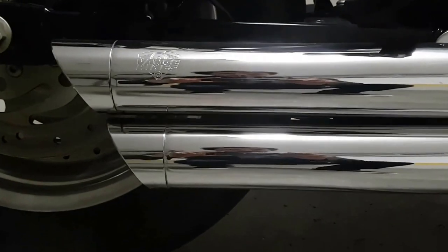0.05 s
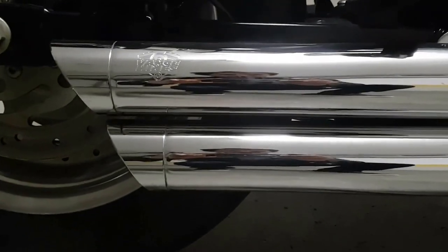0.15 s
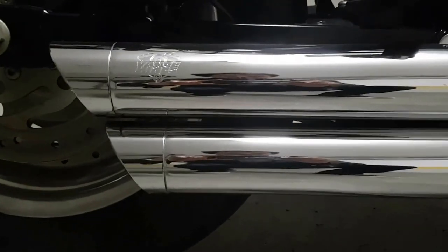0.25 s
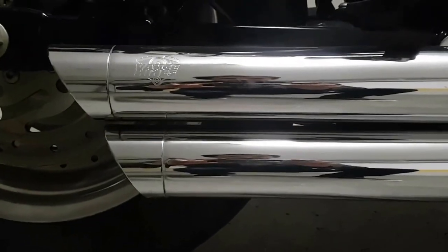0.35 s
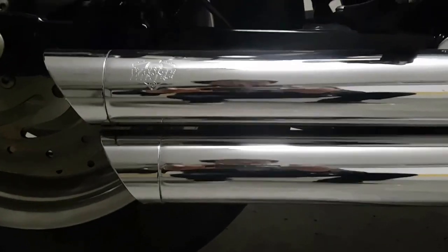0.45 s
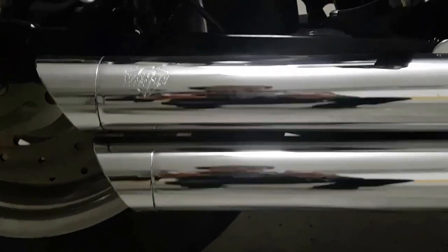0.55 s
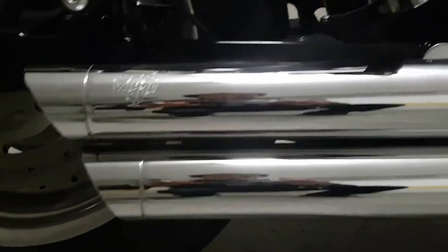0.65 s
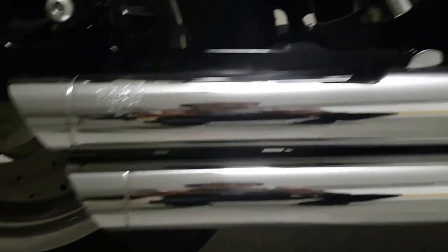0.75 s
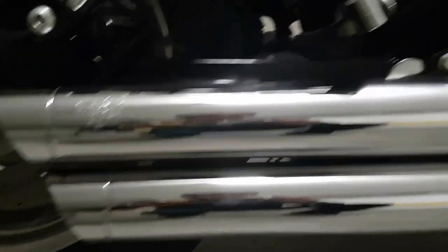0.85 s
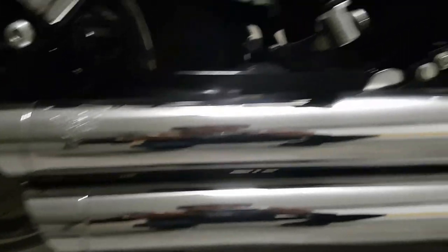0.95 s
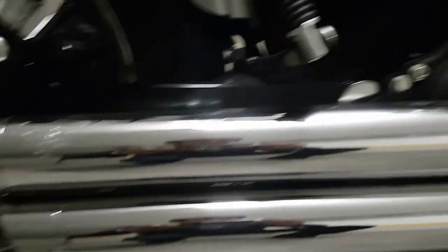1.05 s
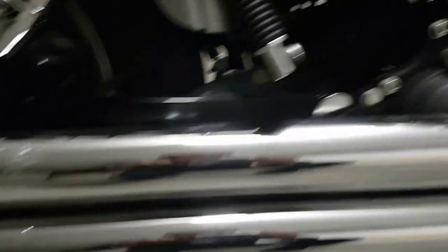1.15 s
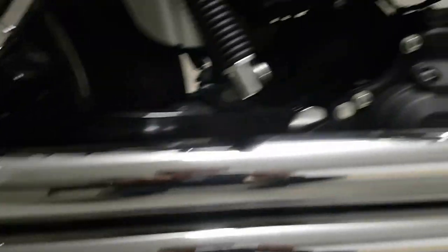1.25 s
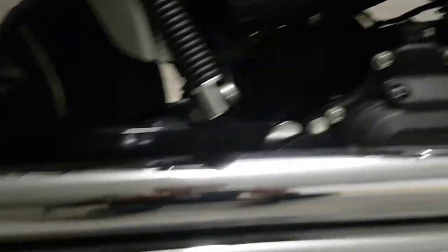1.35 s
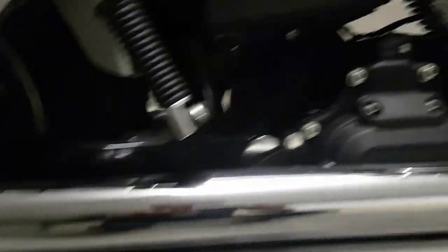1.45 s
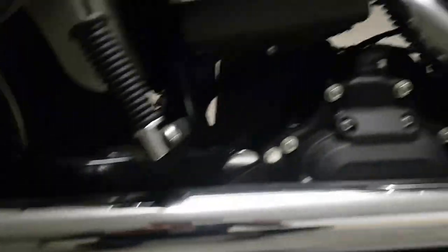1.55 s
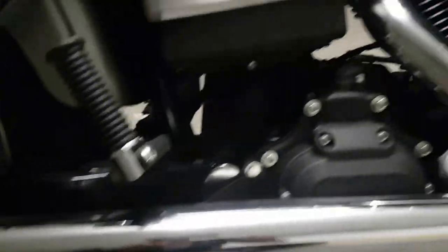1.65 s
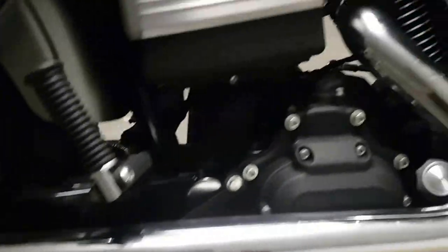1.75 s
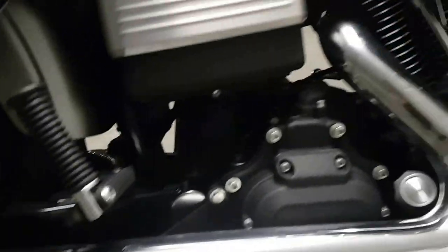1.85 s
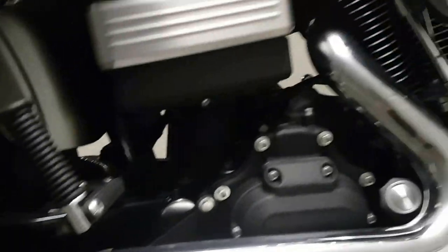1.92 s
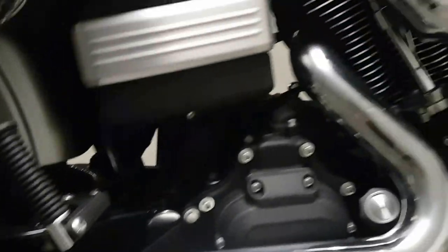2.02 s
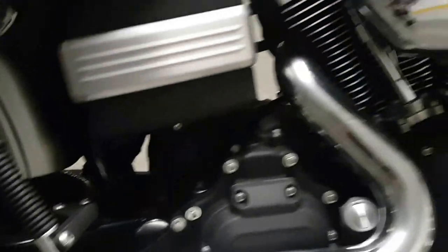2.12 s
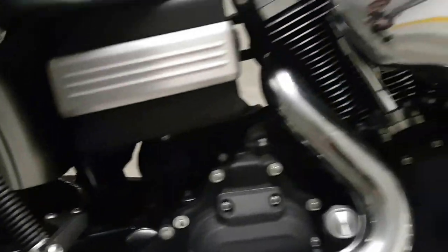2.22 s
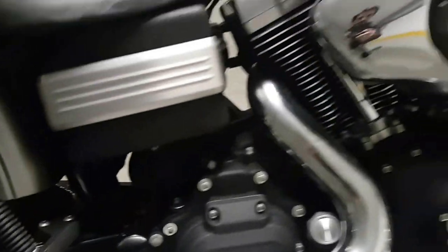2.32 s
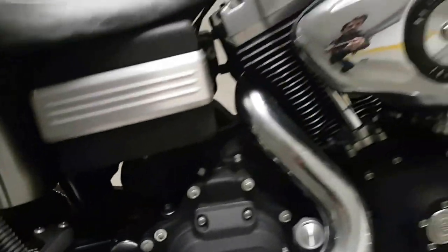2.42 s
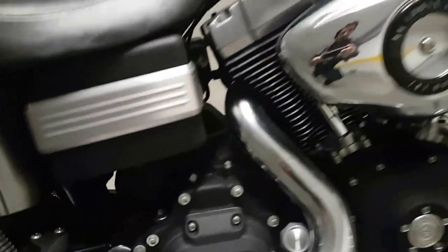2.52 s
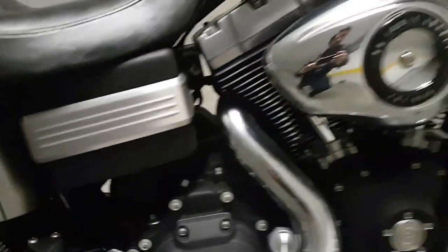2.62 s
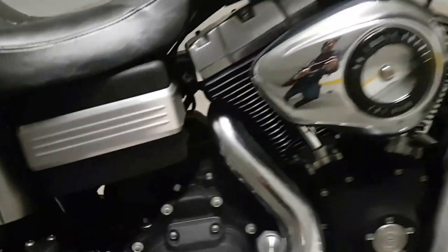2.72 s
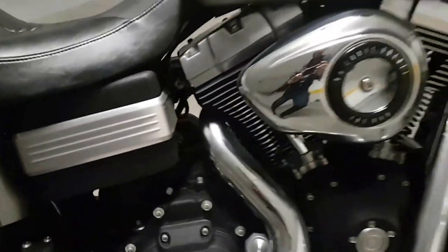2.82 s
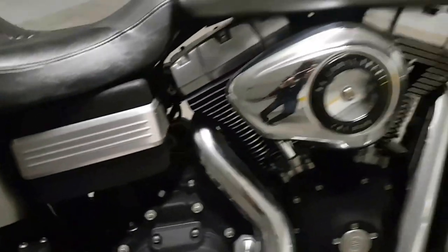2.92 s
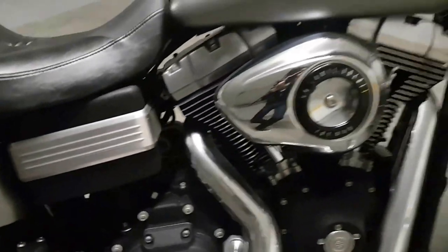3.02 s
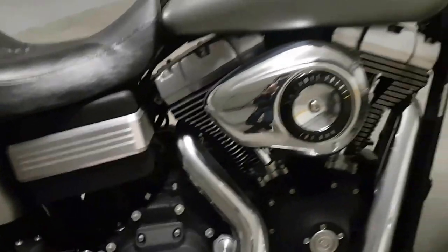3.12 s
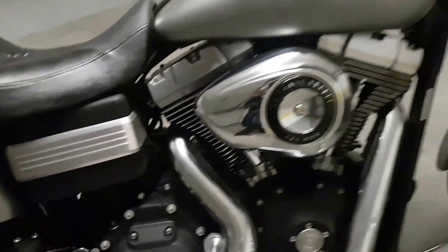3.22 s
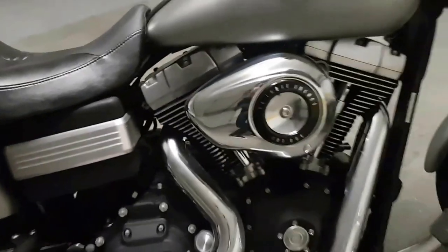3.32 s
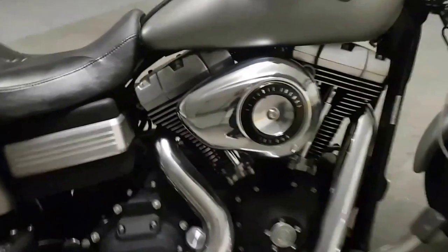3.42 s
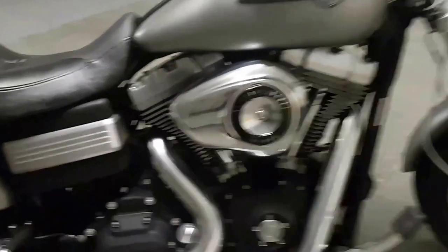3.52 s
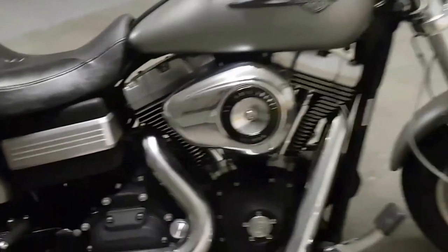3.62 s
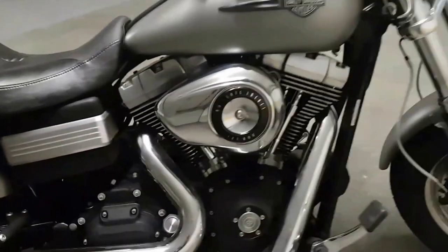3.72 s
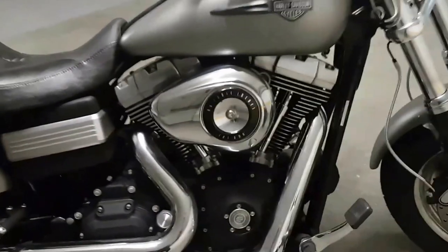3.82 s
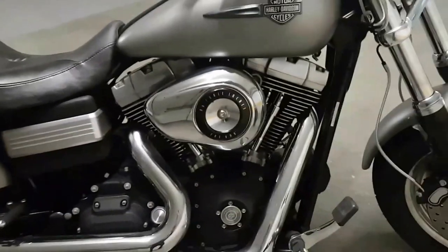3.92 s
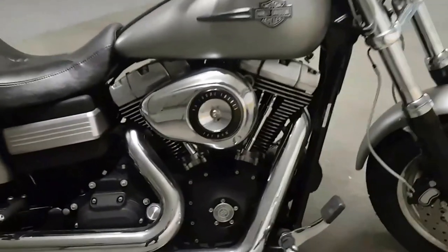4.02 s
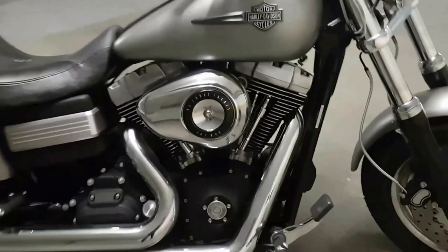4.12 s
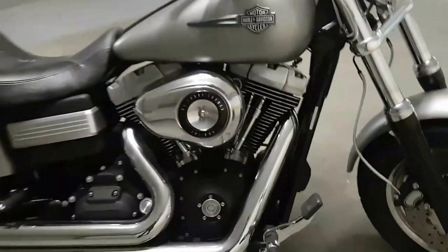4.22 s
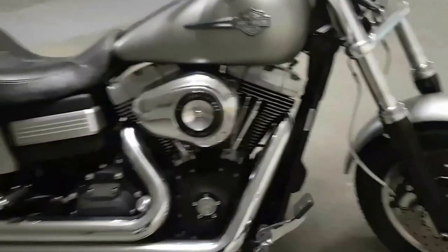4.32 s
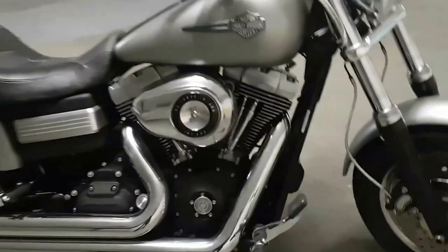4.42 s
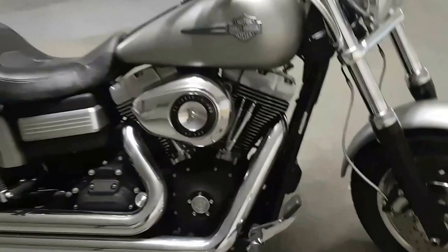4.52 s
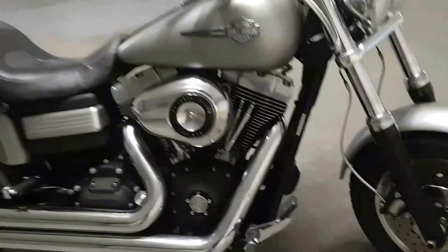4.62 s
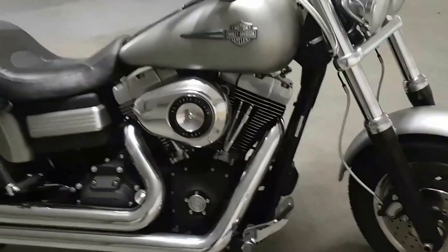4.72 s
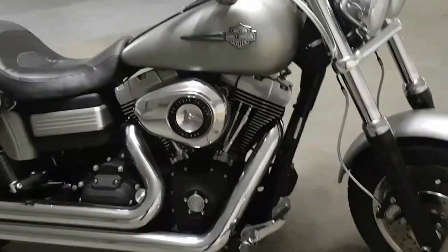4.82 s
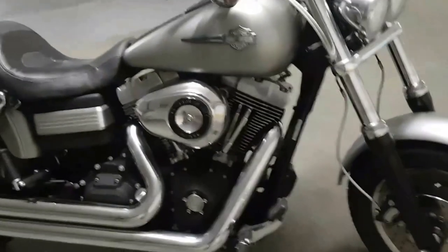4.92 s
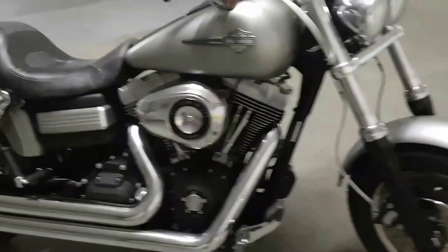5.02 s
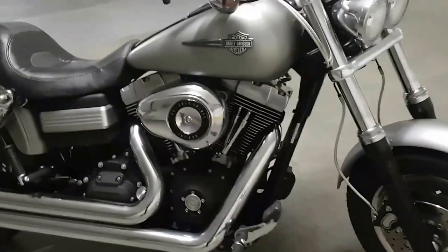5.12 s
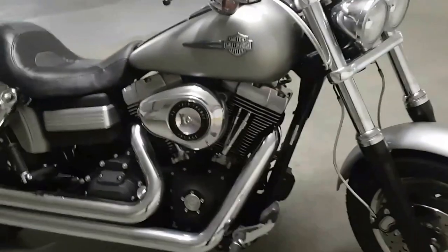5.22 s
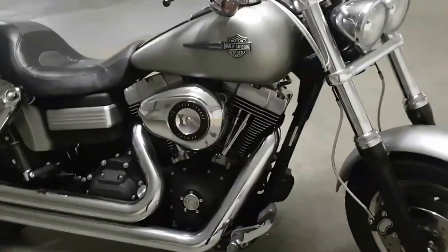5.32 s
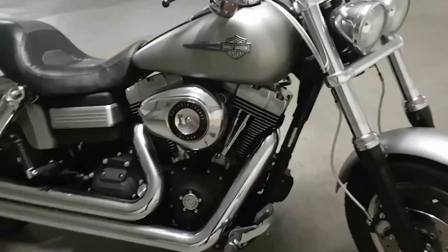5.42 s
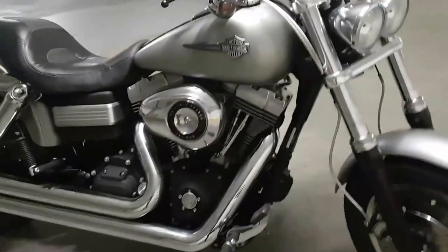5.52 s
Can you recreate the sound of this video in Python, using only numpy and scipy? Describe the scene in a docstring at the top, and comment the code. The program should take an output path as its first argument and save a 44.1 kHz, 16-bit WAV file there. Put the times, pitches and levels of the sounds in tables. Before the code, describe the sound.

Continuous low engine rumble from a standing motorcycle, thick and loud at first by the pipe ends, lurching in uneven bass pulses. As the handheld stereo microphone passes the engine block and retreats, the boom drops and the garage's blurred resonance remains. Midrange murmur is fuller near the engine around 2.8 seconds. Soft hiss lies underneath; barely audible ticks, squeaks and metal clinks appear briefly.

```python
"""A parked motorcycle rumbles broadly, without a regular beat, in a concrete garage; a moving stereo pair hears it.
Rumble: shaped noise, noise-driven hall resonances and two straying low tones, with uneven swells of the boom.
Roar: shaped noise, dull and bright, with fuzzy narrow bands. Levels follow the distances to pipes and engine.
Near the microphones: a faint noise whistle, noise ticks, gliding squeaks and ringing metal clinks.
Microphone hiss is added, then a low-pass limits the band."""
import sys
import numpy as np
from scipy import signal
from scipy.fft import rfft, irfft, next_fast_len
from scipy.io import wavfile
from scipy.ndimage import uniform_filter1d

SR = 44100
rng = np.random.default_rng(int(sys.argv[2]) if len(sys.argv) > 2 else 0)


def generate_wav(sig):
    """Save sig (samples, or channels by samples) to the path in sys.argv[1] as 16-bit PCM at SR."""
    pcm = np.round(np.clip(np.atleast_2d(sig).T, -1, 1) * 32767).astype(np.int16)
    wavfile.write(sys.argv[1], SR, pcm)


N = 244755

# microphone path: t/s, distance from pipe ends/m, distance from engine block/m
MIC_PATH = [(0.0, 0.51, 1.37), (.9, 0.5, 0.85), (1.8, 0.61, 0.97), (2.3, 0.6, 0.63), (2.8, 0.91, 0.42),
            (3.3, 0.83, 0.55), (4.1, 1.13, 0.85), (4.9, 1.48, 1.41), (5.55, 1.71, 1.07)]
# layer: level at 1 m from both/dB, loss per doubled distance from pipe ends/dB, from engine block/dB
DISTANCE_LOSS = {"boom": (-34.5, 5.2, 0.1), "lower": (-33, 4.92, 0.096), "middle": (-36, 0.57, 3.87),
                 "upper": (-39, 2.6, 0.32), "dull": (-45, 3.3, 0.34), "bright": (-57, 1.6, 1.1),
                 "whine": (-64, 2.6, 1.4), "high": (-69, 8.9, 5.4)}
# left-right likeness of the noise layers: f/Hz, likeness/0..1
STEREO_LIKENESS = [(30, .995), (110, .985), (210, .95), (390, .88), (720, .63), (1350, .04), (4670, .02)]
# channel balance of noise: f/Hz, left minus right/dB
STEREO_TILT = [(60, -1.5), (260, -1.3), (600, 0), (4670, -.3)]
# lowest standing wave: t/s, level/dB
LOWEST_WAVE = [(0.0, -34), (0.49, -33), (0.52, -41), (0.63, -28), (1.47, -51), (1.56, -27.5), (1.85, -39),
               (1.92, -29), (2.29, -28.5), (2.72, -37), (3.04, -29), (3.2, -37.5), (3.76, -30.5),
               (3.85, -46), (3.91, -34), (5.55, -38)]
# uneven swells of the boom: t of top/s, level/dB, pitch/Hz
BOOM_SWELLS = [(0.122, -16.5, 78.1), (0.224, -30.5, 83.8), (0.267, -14.5, 79.2), (0.37, -19.5, 77.5),
               (0.49, -21.5, 76.1), (0.532, -28, 86), (0.622, -18.5, 80.7), (0.754, -19.5, 80.3),
               (0.803, -20.5, 73), (0.87, -24.5, 83.34), (0.969, -26.5, 71.35), (1.037, -19.5, 69.9),
               (1.142, -15, 75.6), (1.239, -26.5, 70.93), (1.382, -26, 79.0), (1.585, -21.5, 79.86),
               (1.628, -14.5, 79.5), (1.771, -24, 79.9), (1.863, -24, 76.46), (1.903, -31, 82.0),
               (1.989, -30, 84.1), (2.053, -28, 81.9), (2.096, -20.5, 78.0), (2.198, -30, 71.66),
               (2.239, -23.5, 83.05), (2.305, -26.5, 77.0), (2.35, -39, 92.15), (2.399, -22, 79.8),
               (2.476, -26.5, 80.14), (2.515, -34, 81.8), (2.617, -24.5, 79.85), (2.691, -26.5, 80.0),
               (2.775, -23, 76.4), (2.869, -25, 71.7), (2.91, -31, 77.27), (2.953, -28.5, 79.0),
               (3.008, -24, 69.6), (3.057, -29, 70.8), (3.094, -27, 72.77), (3.143, -22.5, 84.76),
               (3.236, -21.5, 77.1), (3.287, -27, 81.2), (3.371, -25.5, 72.54), (3.436, -29, 80.8),
               (3.48, -27, 88.3), (3.667, -29, 81.4), (3.759, -20.5, 75.86), (3.906, -31, 80.0),
               (3.962, -30.5, 83.3), (4.003, -23.5, 71.66), (4.094, -23.5, 83.0), (4.151, -24, 78),
               (4.253, -31, 75.0), (4.328, -39, 77.05), (4.372, -22, 73.0), (4.552, -27, 73.0),
               (4.641, -25.5, 70.5), (4.746, -30, 75.54), (4.898, -28.5, 72.0), (4.995, -28, 80.6),
               (5.151, -32, 80.1), (5.212, -28.5, 73.7), (5.319, -24.0, 80.7), (5.479, -27.5, 79.8)]
# rumble spectrum: f/Hz, relative density/dB per Hz
RUMBLE_SPECTRUM = [(8, -40.5), (16, -16.5), (30, -5.5), (58, 5), (78, -8), (112, 2), (180, -9), (340, -24),
                   (520, -53), (2000, -120)]
# hall resonances, three groups: f/Hz, width/Hz, relative level/dB
LOWER_MODES = [(103.4, 40, -0.5), (136.6, 20, -1), (161.4, 32, -4.5)]
MIDDLE_MODES = [(182.6, 15, -5), (203, 13.6, 2), (238.8, 16, -0.5), (249.4, 29, -2)]
UPPER_MODES = [(276.8, 9.9, 4.5), (281.3, 63, -0.5), (303, 78, -5.5), (327.2, 25, -0.5), (421, 31, -9),
               (682, 130, -16), (930, 57, -24.5)]
# roar spectrum ahead of the dull/bright split: f/Hz, relative density/dB per Hz
ROAR_SPECTRUM = [(210, -35), (350, -2.5), (424, -6), (561, -11), (702, -15.5), (983, -19.5), (1360, -21),
                 (2090, -22.5), (2360, -24), (2670, -22.5), (2950, -26), (3270, -26.5), (3800, -29.5),
                 (4400, -32.5), (5120, -39), (5700, -46), (6660, -61), (11300, -120)]
# fuzzy bands in the roar, lower and higher group: f/Hz, width/Hz, relative level/dB
WHINE_LOW_MODES = [(1517, 93, 1), (1700, 67, 0), (1848, 120, -4)]
WHINE_HIGH_MODES = [(2000, 180, -8), (2082, 260, 0.5), (2660, 130, -5)]
# whistle swells: t/s, half length/s, level/dB
WHISTLE_SWELLS = [(0.048, 0.067, -70.5), (2.84, 0.024, -76), (2.88, 0.16, -77), (3.85, 0.12, -77.5),
                  (4.8, .2, -74.5)]
# whistle bands: f/Hz, width/Hz, relative level/dB
WHISTLE_MODES = [(8800, 630, -1.5), (10800, 2700, -8)]
# dry ticks and a knock: t/s, peak before pan/dB, centre f/Hz, width/Hz, t60/s, left minus right/dB
TICK_EVENTS = [(1.107, -60, 14100, 2002, 0.013, 1), (1.922, -63, 13920, 2500, .012, 0),
               (1.964, -59, 8440, 4000, .015, 9), (2.319, -53, 5600, 1500, 0.025, 5),
               (2.3195, -49.5, 11660, 5000, 0.029, 6), (4.315, -40, 916, 190, 0.031, 4),
               (4.673, -58, 4335, 180, 0.022, .5), (4.675, -62, 5250, 180, 0.026, .5),
               (4.678, -59, 15220, 883, 0.02, 0), (5.005, -65, 8610, 1478, 0.019, .5)]
# squeaks: t/s, length/s, level/dB, from f/Hz, to f/Hz
SQUEAK_EVENTS = [(1.249, 0.041, -83, 11450, 11900), (1.319, 0.088, -86, 9850, 9380),
                 (1.45, 0.027, -85, 9400, 9100), (1.317, 0.024, -82, 9200, 9000),
                 (1.386, 0.075, -84, 11820, 11400), (3.645, 0.063, -77, 10880, 11600),
                 (3.723, 0.037, -78, 11430, 10840)]
# metal clinks: t/s, peak before pan/dB, left minus right/dB
CLINK_EVENTS = [(4.3289, -53, 6.2), (4.679, -64, 1.2)]
# clink partials: f/Hz, relative level/dB, t60/s
METAL_MODES = [(11750, 0, .025), (11830, -16, .16), (11940, -18, .12), (13250, -6, .025)]
# hiss spectrum: f/Hz, relative density/dB per Hz
HISS_SPECTRUM = [(2500, -20), (5000, 1), (5800, 1.5), (7300, -5), (8900, -1.5), (10000, -4.5), (12000, -2),
                 (14000, -1), (15700, 0)]

RUMBLE_TRIM_DB, LOWER_TRIM_DB = -1.8, 0.5  # both against the "lower" layer level
BOOM_FOLLOW_DB_PER_DB = 0.048  # gain of rumble and lower modes per dB of boom swell
SWELL_RISE_S, SWELL_FALL_S = 0.026, 0.025  # boom swell: from top to about 9 dB below it
SPLIT_HZ, GRAIN_DB = 1250, 0.7  # dull/bright crossover; quick rms unevenness of the bright half
WHINE_SWELL_T_S, WHINE_SWELL_HALF_S, WHINE_SWELL_DB = 3.75, 0.31, 5.6  # lower fuzzy bands stand out
SHAKE_HZ, SHAKE_DB = 130, 4.5  # rms straying of a squeak
HISS_DB, HISS_LIKENESS = -69, 0.17
EDGE_HZ = 15750


def gain_of(db):
    """Decibels to amplitude factor."""
    return 10 ** (np.asarray(db) / 20)


def evened(x):
    """Scales to rms 1."""
    return x / np.sqrt(np.mean(x ** 2) + 1e-20)


def read(points, hz):
    """Interpolates a table on a log-frequency axis."""
    f_hz, value = np.transpose(points)
    return np.interp(np.log(hz + 1), np.log(f_hz + 1), value)


def curves(rows):
    """One value per sample for each column after t."""
    t_s, *columns = np.transpose(rows)
    return [np.interp(np.arange(N) / SR, t_s, column) for column in columns]


def modes_db(modes, hz):
    """Summed power of noise-driven resonances with steep flanks, in dB."""
    power = 0
    for f_hz, width_hz, db in modes:
        power = power + gain_of(2 * db) / (1 + (2 * (hz - f_hz) / width_hz) ** 2) ** 2
    return 10 * np.log10(power)


def field(shape_db, likeness=STEREO_LIKENESS):
    """Stereo noise at rms 1; likeness sets how much the channels share at each frequency."""
    hz = np.fft.rfftfreq(next_fast_len(N), 1 / SR)
    a, b, c, d = rng.standard_normal((len(hz), 4)).T
    alike = np.clip(read(likeness, hz), 0, 1)
    left = a + 1j * b
    right = alike * left + np.sqrt(1 - alike ** 2) * (c + 1j * d)
    half_tilt_db = read(STEREO_TILT, hz) / 2
    tilted = np.array([left * gain_of(half_tilt_db), right * gain_of(-half_tilt_db)])
    return evened(irfft(tilted * gain_of(shape_db(hz)))[:, :N])


def drifting(x, patchy_db, bins):
    """Shifts the colour in slow random time-frequency patches common to both channels."""
    z = signal.stft(x, nperseg=1024, noverlap=768)[2]
    patches = rng.standard_normal(z.shape[1:])
    patches = uniform_filter1d(patches, size=bins, axis=0)
    patches = evened(uniform_filter1d(patches, size=50, axis=1))
    return signal.istft(z * gain_of(patchy_db * patches), nperseg=1024, noverlap=768)[1][:, :N]


def placed(t_s, sound, pan_db):
    """Puts a short sound at its moment and side."""
    out = np.zeros(N)
    start = round(t_s * SR)
    out[start:start + len(sound)] = sound
    return out * gain_of([[pan_db / 2], [-pan_db / 2]])


def levels():
    """Layer levels in dB: a fixed loss per doubling of each source distance."""
    pipes, engine = np.log2(curves(MIC_PATH))  # doublings of 1 m
    return {name: db - pipes_db * pipes - engine_db * engine
            for name, (db, pipes_db, engine_db) in DISTANCE_LOSS.items()}


def boom_shape(rest_db):
    """Level in dB of Gaussian swells added in power to the resting boom; pitch in Hz slides between them."""
    t = np.arange(N) / SR
    power = gain_of(2 * rest_db)
    for top_s, db, _ in BOOM_SWELLS:
        side_s = np.where(t < top_s, SWELL_RISE_S, SWELL_FALL_S)
        power = power + gain_of(2 * db) * np.exp(-2 * ((t - top_s) / side_s) ** 2)
    _, pitch_hz = curves(BOOM_SWELLS)
    return 10 * np.log10(power), pitch_hz


def standing_wave(level_db, hz, wander_hz, flutter_db, per_s, tilt_db, apart_rad):
    """Low tone of randomly straying pitch and level; slight phase and level offsets part the channels."""
    span = round(SR / per_s)
    drift = uniform_filter1d(uniform_filter1d(rng.standard_normal((3, N)), span), span)
    phase = 2 * np.pi * np.cumsum(hz + wander_hz * evened(drift[0])) / SR
    slip = apart_rad * evened(drift[1]) * np.array([[1], [-1]])
    level_db = level_db + flutter_db * evened(drift[2]) + np.array([[tilt_db], [-tilt_db]])
    return np.sqrt(2) * gain_of(level_db) * np.sin(phase + slip)


def hall():
    """Broad rumble noise, the hall resonances it rings and the two lowest standing waves."""
    at = levels()
    boom_db, boom_hz = boom_shape(at["boom"])
    lower_db = at["lower"] + BOOM_FOLLOW_DB_PER_DB * (boom_db - at["boom"])
    lowest_db, = curves(LOWEST_WAVE)
    lowest = standing_wave(lowest_db, hz=40, wander_hz=3.5, flutter_db=1.8, per_s=35, tilt_db=-.6, apart_rad=.06)
    boom = standing_wave(boom_db, boom_hz, wander_hz=6, flutter_db=1.1, per_s=45, tilt_db=-.75, apart_rad=.08)
    rumble = gain_of(lower_db + RUMBLE_TRIM_DB) * field(lambda hz: read(RUMBLE_SPECTRUM, hz))
    lower = gain_of(lower_db + LOWER_TRIM_DB) * field(lambda hz: modes_db(LOWER_MODES, hz))
    middle = gain_of(at["middle"]) * field(lambda hz: modes_db(MIDDLE_MODES, hz))
    upper = gain_of(at["upper"]) * field(lambda hz: modes_db(UPPER_MODES, hz))
    return lowest + boom + rumble + lower + middle + upper


def dull_db(hz):
    """Roar spectrum below the crossover."""
    return read(ROAR_SPECTRUM, hz) - 10 * np.log10(1 + (hz / SPLIT_HZ) ** 6)


def bright_db(hz):
    """Roar spectrum above the crossover."""
    return read(ROAR_SPECTRUM, hz) - 10 * np.log10(1 + (SPLIT_HZ / (hz + 1)) ** 6)


def roar():
    """Diffuse upper rumble: dull and bright noise plus fuzzy resonant bands."""
    at = levels()
    t = np.arange(N) / SR
    whine_db = at["whine"] + WHINE_SWELL_DB * np.exp(-((t - WHINE_SWELL_T_S) / WHINE_SWELL_HALF_S) ** 2)
    grain_db = GRAIN_DB * evened(uniform_filter1d(rng.standard_normal(N), size=90))
    dull = gain_of(at["dull"]) * field(dull_db)
    bright = gain_of(at["bright"] + grain_db) * field(bright_db)
    whine_low = gain_of(whine_db) * field(lambda hz: modes_db(WHINE_LOW_MODES, hz))
    whine_high = gain_of(at["high"]) * field(lambda hz: modes_db(WHINE_HIGH_MODES, hz))
    # the microphones move through the reflections
    return drifting(dull + bright + whine_low + whine_high, patchy_db=1.0, bins=3)


def whistle():
    """Faint narrow-band noise in Gaussian swells."""
    t = np.arange(N) / SR
    swells = sum(gain_of(db) * np.exp(-((t - t_s) / half_s) ** 2) for t_s, half_s, db in WHISTLE_SWELLS)
    return swells * field(lambda hz: modes_db(WHISTLE_MODES, hz))


def tick(t_s, peak_db, hz, width_hz, t60_s, pan_db):
    """Exponentially decaying noise through a Gaussian band."""
    t = np.arange(4096) / SR
    snap = rng.standard_normal(len(t)) * gain_of(-60 * t / t60_s)
    band = np.exp(-((np.fft.rfftfreq(len(t), 1 / SR) - hz) / width_hz) ** 2)
    lead = 32  # samples of room for the filter's pre-ring
    snap = np.roll(irfft(rfft(snap) * band), lead)
    return placed(t_s - lead / SR, gain_of(peak_db) * snap / abs(snap).max(), pan_db)


def squeak(t_s, length_s, db, from_hz, to_hz):
    """Shaky gliding tone that bends most at its low end."""
    u = np.arange(0, length_s, 1 / SR) / length_s
    bend = np.sin(np.pi / 2 * u) if to_hz > from_hz else 1 - np.cos(np.pi / 2 * u)
    shake = evened(uniform_filter1d(rng.standard_normal((2, len(u))), size=120))
    pitch_hz = from_hz + (to_hz - from_hz) * bend + SHAKE_HZ * shake[0]
    tone = np.sin(2 * np.pi * np.cumsum(pitch_hz) / SR)
    envelope = np.sqrt(2) * gain_of(db + SHAKE_DB * shake[1]) * np.sqrt(np.sin(np.pi * u))
    return placed(t_s, envelope * tone, 0)


def clink(t_s, peak_db, pan_db):
    """Small metal part struck once: decaying partials with a soft onset."""
    t = np.arange(6000) / SR
    ring = sum(gain_of(db - 60 * t / t60_s) * np.sin(2 * np.pi * hz * t) for hz, db, t60_s in METAL_MODES)
    ring = ring * (1 - np.exp(-t / .0008))
    return placed(t_s, gain_of(peak_db) * ring / abs(ring).max(), pan_db)


def scene():
    """Sums the hall, the roar and the small near sounds."""
    ticks = sum(tick(*row) for row in TICK_EVENTS)
    squeaks = sum(squeak(*row) for row in SQUEAK_EVENTS)
    clinks = sum(clink(*row) for row in CLINK_EVENTS)
    return hall() + roar() + whistle() + ticks + squeaks + clinks


def record(dry):
    """Adds slightly wavering microphone hiss, then a linear-phase low-pass."""
    hiss = field(lambda hz: read(HISS_SPECTRUM, hz), likeness=[(0, HISS_LIKENESS)])
    wet = dry + gain_of(HISS_DB) * drifting(hiss, patchy_db=0.7, bins=51)
    wet = np.pad(wet, ((0, 0), (1023, 1023)), "edge")
    low_pass = signal.firwin(2047, EDGE_HZ, window=("kaiser", 9), fs=SR)
    return signal.oaconvolve(wet, low_pass[None], "valid", axes=1)


dry = scene()
out = record(dry)
generate_wav(out)
```